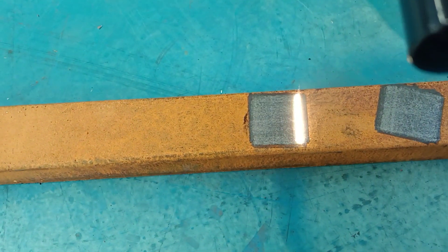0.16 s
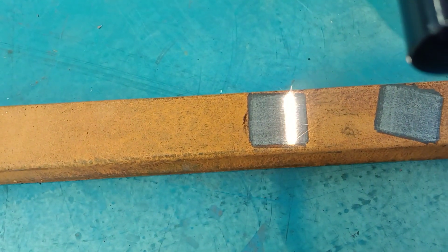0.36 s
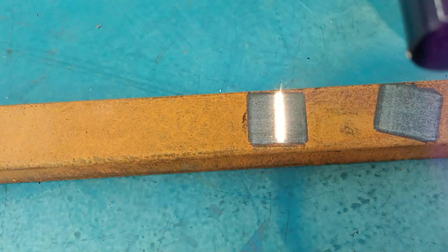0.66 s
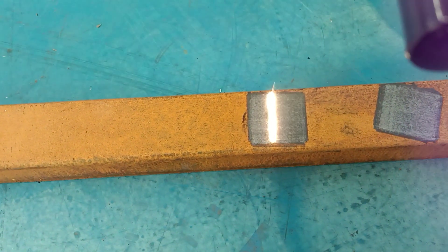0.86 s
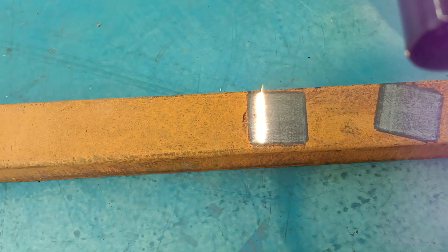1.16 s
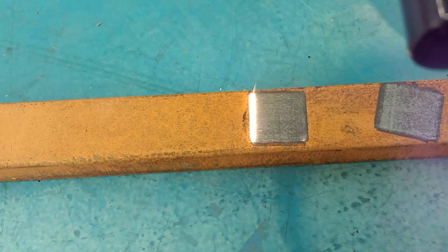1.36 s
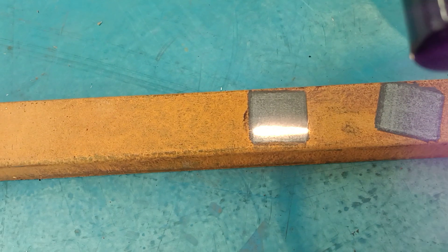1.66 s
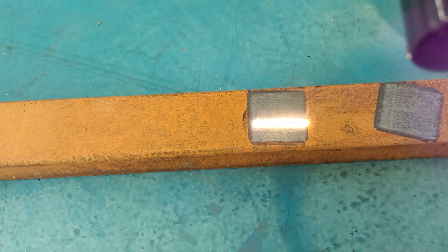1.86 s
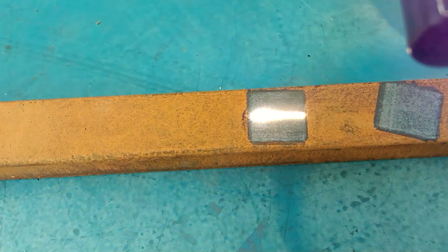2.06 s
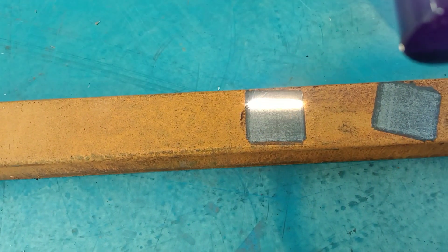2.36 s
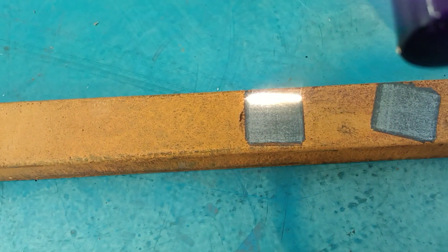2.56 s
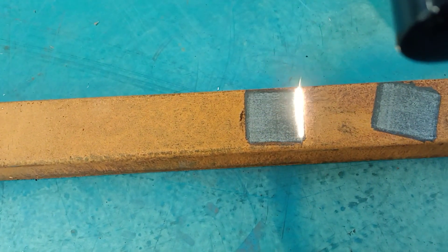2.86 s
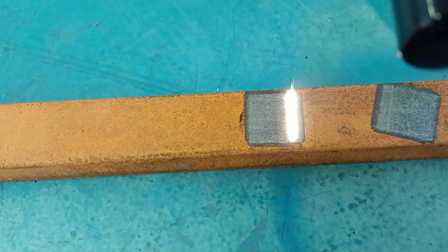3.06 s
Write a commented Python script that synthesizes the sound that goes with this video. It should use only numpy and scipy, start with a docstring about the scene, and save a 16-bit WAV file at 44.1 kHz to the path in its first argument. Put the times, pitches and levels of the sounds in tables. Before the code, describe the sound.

Harsh, bright laser sizzle with a rapid electric buzz runs continuously, dipping briefly between sweeping passes.

```python
"""Pulsed laser on a metal plate

A pulsed laser sweeps a line over a small plate about 122 times a second and burns off the surface. Each sweep's
crackle partly repeats the last, so the hiss buzzes; it dips just before two of the passes. Behind it an
extraction fan sounds in a workshop: resonated noise for blades and duct, coloured noise for rumble and rush,
wandering sines for hum lines, the middle one at four times the sweep rate. A low sine roughened by noise comes
and goes."""
import sys
import numpy as np
from scipy import signal
from scipy.fft import rfft, irfft, next_fast_len
from scipy.io import wavfile
from scipy.ndimage import uniform_filter1d

SR = 44100
rng = np.random.default_rng(int(sys.argv[2]) if len(sys.argv) > 2 else 0)


def bounce(signal):
    """Save signal as a 16-bit WAV file at the path given by the first command-line argument."""
    frames = np.transpose(np.atleast_2d(signal))
    limited = np.clip(frames, -1, 1)
    pcm = np.round(limited * 32767).astype(np.int16)
    wavfile.write(sys.argv[1], SR, pcm)


N = 142443  # length in samples


def from_db(db):
    """Turns decibels into an amplitude factor."""
    return 10 ** (np.asarray(db) / 20)


def rms_one(x):
    """Scales a signal to an rms of 1."""
    return x / np.sqrt(np.mean(x ** 2) + 1e-20)


def in_time(rows):
    """Draws straight lines between (seconds, value) points, one value per sample."""
    seconds, values = np.transpose(rows)
    return np.interp(np.arange(N) / SR, seconds, values)


def at_hz(points, hz):
    """Reads a (Hz, value) curve along a logarithmic frequency axis."""
    curve = np.array(points)
    return np.interp(np.log(hz), np.log(curve[:, 0]), curve[:, 1])


def drift(rate_hz):
    """Slow chance: noise through a double one-pole low-pass; spread 1."""
    step = 20  # samples between the points of the slow noise
    r = np.exp(-2 * np.pi * step * rate_hz / SR)
    noise = rng.standard_normal(N // step + 4002)
    slow = signal.lfilter([1], [1, -2 * r, r * r], noise)[4000:]
    return np.interp(np.arange(N) / step, np.arange(len(slow)), rms_one(slow - slow.mean()))


FLICKER_PER_S, FLICKER_SPAN_S = 42, .12  # low-pass rate in Hz, averaging span in seconds


def flutter():
    """Quick flicker with its slow part, a running mean, taken out."""
    quick = drift(FLICKER_PER_S)
    return quick - uniform_filter1d(quick, int(FLICKER_SPAN_S * SR))


def coloured(x, spectrum, gain_db_of_band, bands_per_octave=6):
    """Filters x to a spectrum in overlapping bands, each with its own moving gain; rms 1."""
    size = next_fast_len(N)
    hz = np.maximum(np.arange(size // 2 + 1) * SR / size, 1)
    inside = (hz > spectrum[0][0]) & (hz < spectrum[-1][0] * 1.1)
    shaped = rfft(x, size) * from_db(at_hz(spectrum, hz)) * inside
    place = bands_per_octave * np.log2(hz)
    out = 0
    for k in range(int(place[inside][0]), int(place[inside][-1]) + 2):
        window = np.cos(np.pi / 2 * np.clip(place - k, -1, 1)) ** 2
        band = irfft(shaped * window, size)[:N]
        out = out + band * from_db(gain_db_of_band(2 ** (k / bands_per_octave)))
    return rms_one(out)


def whistle(hz, width_hz):
    """Noise twice through a narrow resonance; rms 1."""
    r = np.exp(-np.pi * width_hz / SR)
    poles = [1, -2 * r * np.cos(2 * np.pi * hz / SR), r * r]
    once = signal.lfilter([1, 0, -1], poles, rng.standard_normal(N + SR))
    return rms_one(signal.lfilter([1], poles, once)[SR:])  # the first second settles the filter


# The low hum's entries. Each row: start in seconds, end in seconds, gain in dB.
HUM_TIMES = [(0, 0.15, -57), (0.857, 0.934, -59), (0.986, 1.437, -55), (1.59, 2.08, -56)]
HUM_HZ, HUM_WIDTH_HZ, HUM_EDGE_S = 76.3, 16, 0.017
HUM_WAVER, HUM_BODY, HUM_BODY_TOP_HZ = 0.45, 0.57, 113  # both levels are rms against a sine of peak 1


def hum():
    """A low sine roughened by resonated noise, on a dull rumble, faded in and out by short ramps."""
    t = np.arange(N) / SR
    gate = 0
    for start, end, db in HUM_TIMES:
        ramp = np.minimum(t - start, end - t) / HUM_EDGE_S + .5
        gate = gate + from_db(db) * np.clip(ramp, 0, 1)
    band = signal.butter(2, [25, HUM_BODY_TOP_HZ], "band", fs=SR, output="sos")
    body = rms_one(signal.sosfilt(band, rng.standard_normal(N)))
    tone = np.sin(2 * np.pi * HUM_HZ * t) + HUM_WAVER * whistle(HUM_HZ, HUM_WIDTH_HZ)
    return gate * (tone + HUM_BODY * body)


# Centre pitches of three steady lines, low to high, in Hz; the middle one sits at four times the laser's sweep
# rate.
HUM_LINES_HZ = [297.3, 485, 599]
# Their swells. Each row: time in seconds, then the middle level in dB of the low, mid and top line.
HUM_LINE_LEVELS = [(0.0, -56, -47, -53), (0.03, -42.5, -54.5, -54), (0.97, -57, -55, -55),
                   (1.47, -49, -71, -59), (1.63, -58.5, -53, -54.5), (2.13, -45.5, -57, -61),
                   (2.28, -55, -68, -79), (2.35, -47, -56, -61), (3.15, -44, -58, -54),
                   (3.23, -70, -62, -62)]
LINE_WANDER_HZ, LINE_WAVER_DB = 2.2, 2.3


def hum_lines():
    """Sines whose pitch wanders and whose level wavers around a slow swell."""
    rows = np.array(HUM_LINE_LEVELS)
    out = 0
    for k, hz in enumerate(HUM_LINES_HZ):
        pitch_hz = hz + LINE_WANDER_HZ * drift(10.9)
        phase = 2 * np.pi * np.cumsum(pitch_hz) / SR
        level_db = in_time(rows[:, [0, k + 1]]) + LINE_WAVER_DB * drift(28.0)
        out = out + np.sqrt(2) * from_db(level_db) * np.sin(phase)
    return out


TONE_WAVER_DB, TONE_WAVER_PER_S = 2.0, 9.6  # shared by the blade tones and the lowest sweep tones
# Blade tones of the fan. Each row: pitch in Hz, resonance width in Hz, middle level in dB.
BLADE_TONES = [(371, 33, -64), (1181, 19, -62.5), (216.4, 14, -62.5)]


def blade_tones():
    """Breathy fan tones: noise through narrow resonances, wavering in level."""
    out = 0
    for hz, width_hz, db in BLADE_TONES:
        level_db = db + TONE_WAVER_DB * drift(TONE_WAVER_PER_S)
        out = out + from_db(level_db) * whistle(hz, width_hz)
    return out


# Colour of the fan rumble. Each row: frequency in Hz, relative density in dB per Hz.
RUMBLE_COLOUR = [(25, -21), (45, -47), (100, -15.5), (180, -7), (250, -4), (330, -0.5), (420, -18.5),
                 (480, -6), (600, -6), (680, -15), (800, -41)]
RUMBLE_DB, RUMBLE_FLICKER_DB = -49, 6
RUMBLE_SINKS_HZ, RUMBLE_SINKS = 440, .45  # lowest sinking band, share of the top line's dB swing


def rumble():
    """Lumpy low noise in flickering bands; its upper part sinks and rises with the top hum line."""
    top_line_db = in_time(np.array(HUM_LINE_LEVELS)[:, [0, 3]])
    sink_db = RUMBLE_SINKS * (top_line_db - np.median(top_line_db))

    def band_db(hz):
        return RUMBLE_FLICKER_DB * drift(10.4) + sink_db * (hz > RUMBLE_SINKS_HZ)

    return from_db(RUMBLE_DB) * coloured(rng.standard_normal(N), RUMBLE_COLOUR, band_db)


# Colour of the air rush. Each row: frequency in Hz, relative density in dB per Hz.
RUSH_COLOUR = [(640, -7), (740, -4.5), (860, 0.5), (930, -1), (1000, -6.5), (1100, -6)]
# Its swells. Each row: time in seconds, level in dB.
RUSH_LEVEL = [(0.0, -50), (0.11, -63), (1.38, -63), (1.56, -50.5), (1.65, -73), (1.87, -53.5), (1.99, -67),
              (2.46, -70), (2.86, -74), (3.23, -57)]


def rush():
    """A faint rush of air between rumble and hiss: flickering bands of noise."""
    noise = rng.standard_normal(N)
    air = coloured(noise, RUSH_COLOUR, lambda hz: 5.5 * drift(8.8), bands_per_octave=10)
    return from_db(in_time(RUSH_LEVEL)) * air


# Swells of the duct resonance. Each row: time in seconds, level in dB.
DUCT_LEVEL = [(0.0, -48), (0.05, -41), (0.15, -47.5), (0.46, -44), (0.75, -48.5), (0.78, -45.5),
              (1.55, -65), (1.61, -52), (1.96, -94), (2.01, -52), (2.31, -78), (2.37, -45), (2.92, -54),
              (3.23, -45.5)]
DUCT_HZ, DUCT_WIDTH_HZ = 212.4, 61


def fan():
    """Blade tones, three wandering lines (the middle one at four times the laser's sweep rate), rumble and
    rush, with noise ringing in a duct that swells and fades."""
    duct = from_db(in_time(DUCT_LEVEL)) * whistle(DUCT_HZ, DUCT_WIDTH_HZ)
    return blade_tones() + hum_lines() + duct + rumble() + rush()


SWEEPS_PER_S = 121.87
# Crackle carried into the next sweep. Each row: frequency in Hz, amplitude share 0-1.
SWEEP_RETURN = [(1000, 0.5), (2500, 0.5), (4500, 0.71), (7000, 0), (15000, 0.7)]
# Level of the repeating part within the crackle. Each row: frequency in Hz, level in dB.
REPEATING_LEVEL = [(1000, -0.5), (2500, -2.5), (4500, -4), (6500, -1.5), (9000, -4.5), (15000, -10)]
PULSE_DEPTH, TURN_DEPTH = .105, .095  # swing once and twice a sweep
SPARK_DB, SPARK_PER_S = 1, 315  # unevenness of the crackle


def sweep_crackle():
    """Noise partly fed back one sweep later, pulsed by the mirror and uneven in level."""
    size = next_fast_len(N + SR // 2)
    hz = np.maximum(np.arange(size // 2 + 1) * SR / size, 1)
    back = np.clip(at_hz(SWEEP_RETURN, hz), 0, .95)
    one_sweep_later = np.exp(-2j * np.pi * hz / SWEEPS_PER_S)
    repeat = np.sqrt(1 - back ** 2) / (1 - back * one_sweep_later)
    old, fresh = rfft(rng.standard_normal((2, size)))
    share = np.clip(from_db(2 * at_hz(REPEATING_LEVEL, hz)), 0, 1)  # as power
    crackle = irfft(np.sqrt(share) * old * repeat + np.sqrt(1 - share) * fresh, size)[:N]
    turn = 2 * np.pi * SWEEPS_PER_S * np.arange(N) / SR
    mirror = 1 + PULSE_DEPTH * np.cos(turn) + TURN_DEPTH * np.cos(2 * turn)
    return crackle * mirror * from_db(SPARK_DB * drift(SPARK_PER_S))


# The beam slackens, then starts a new pass. Each row: restart in seconds, depth in dB.
BEAM_RESTARTS = [(0.075, -6), (2.936, -5)]
SLACKEN_S, SLACK_HOLD_S, RETURN_S = 0.058, 0.026, 0.003


def beam_slack_db():
    """The beam's dips in dB: a ramp down, a short hold, and a quick return from the restart on."""
    t = np.arange(N) / SR
    slack = 0
    for restart, db in BEAM_RESTARTS:
        falling = 1 + (t - restart + SLACK_HOLD_S) / SLACKEN_S
        returning = 1 - (t - restart) / RETURN_S
        slack = slack + db * np.clip(np.minimum(falling, returning), 0, 1)
    return slack


# Colour of the hiss as it reaches the microphone. Each row: frequency in Hz, relative density in dB per Hz.
HISS_COLOUR = [(1000, -49), (1080, -36.5), (1190, -19), (1400, -21.5), (1470, -15.5), (1540, -18),
               (1650, -16), (2000, -23), (2200, -14.5), (2380, -7), (2550, -12), (2850, -15), (3000, -9),
               (3170, 1.5), (3300, -2), (3600, 1.5), (3830, -8), (3950, -2.5), (4080, -8), (4270, 0.5),
               (4700, -3.5), (4900, -13), (5400, -6.5), (5750, -1.5), (6250, -12.5), (6420, -21),
               (6750, -18), (7300, -24.5), (7900, -17.5), (8120, -27.5), (8900, -27), (9200, -35),
               (9330, -46), (9480, -36), (9800, -29.5), (10450, -29.5), (10650, -34), (10950, -24),
               (11600, -32.5), (12000, -28), (12750, -32), (13000, -24.5), (14000, -26), (14400, -27),
               (14900, -21), (15400, -22), (16200, -26)]
# Flicker of each band. Each row: frequency in Hz, factor on the band's own flicker.
BAND_GRAIN = [(1200, 1.7), (2500, 1.3), (5900, 0.8), (6450, 3.8), (7500, 3.8), (8000, 1.0), (14000, 1.3)]
# Extra colour of the crosswise pass. Each row: frequency in Hz, gain in dB.
CROSSWISE_COLOUR = [(1200, 1.5), (1600, -1), (2500, 0.5), (3800, 0.5), (4950, 0.5), (5700, -0.5),
                    (7000, 0.5), (8500, 0), (9800, 0.5), (10800, -0.2), (11800, -0.5), (13500, 2.5),
                    (15500, .4)]
# Colour change within a pass. Each row: frequency in Hz, dB gained over one pass.
PASS_FADE = [(5500, 0.5), (7200, -1.5), (8800, -4), (9800, 4), (10900, -3.5), (11900, -4), (13500, -0.5),
             (15500, 1)]
# Starts of the passes, in seconds.
PASS_STARTS = [.073, 1.49, 2.938]
PASS_S, CROSSWISE_FROM_S, CROSSWISE_TO_S = 1.43, 1.49, 2.94
FLICKER_DB, SHARED_DB, SLOW_DB = 1.5, .5, .4  # scale of band flicker, common flicker and slow band drift
TREBLE_FROM_HZ, TREBLE_SLACKENS = 8500, 1.45  # the treble dips this many times as deep in dB
# as the line turns crosswise one band goes dull, then recovers
DULL_LOW_HZ, DULL_HIGH_HZ, DULL_DB, DULL_RECOVER_S = 9450, 10300, -6, .22


def hiss(slack_db):
    """Colours the crackle in narrow bands that flicker and change with the pass and its direction."""
    t = np.arange(N) / SR
    shared_db = SHARED_DB * (flutter() + drift(9.0))
    treble_db = (TREBLE_SLACKENS - 1) * slack_db
    starts = np.array([PASS_STARTS[0] - PASS_S] + PASS_STARTS)
    latest_start = starts[np.searchsorted(starts, t, "right") - 1]
    progress = (t - latest_start) / PASS_S - .5  # zero halfway through a pass
    crosswise = (t > CROSSWISE_FROM_S) & (t < CROSSWISE_TO_S)
    dull_db = DULL_DB * crosswise * np.exp(-np.abs(t - CROSSWISE_FROM_S) / DULL_RECOVER_S)

    def band_db(hz):
        flicker = shared_db + FLICKER_DB * at_hz(BAND_GRAIN, hz) * flutter() + SLOW_DB * drift(1.0)
        direction = crosswise * at_hz(CROSSWISE_COLOUR, hz) + dull_db * (DULL_LOW_HZ < hz < DULL_HIGH_HZ)
        fade = progress * at_hz(PASS_FADE, hz)
        return flicker + direction + fade + treble_db * (hz > TREBLE_FROM_HZ)

    return coloured(sweep_crackle(), HISS_COLOUR, band_db, bands_per_octave=20)


# Tones standing out of the buzz. Each row: multiple of the sweep rate, middle level in dB against the hiss.
SWEEP_TONES = [(6, -58), (7, -56.5), (10, -37), (12, -31), (19, -27), (20, -28.5), (26, -21), (28, -18),
               (29, -26), (35, -19.5)]


def sweep_tones():
    """Multiples of the sweep rate as narrow resonated noise; those below the ninth waver further."""
    out = 0
    for multiple, db in SWEEP_TONES:
        waver_db = TONE_WAVER_DB * drift(TONE_WAVER_PER_S) * (multiple < 9)
        out = out + from_db(db + waver_db) * whistle(multiple * SWEEPS_PER_S, width_hz=9.1)
    return out


# Vigour of the burning, before the beam's dips. Each row: time in seconds, level in dB.
BURN_LEVEL = [(0, -21.5), (.07, -20), (.1, -23), (.25, -21.5), (.7, -22), (1.1, -22.5), (1.5, -23.5),
              (1.75, -23), (2.1, -22), (2.55, -22), (2.7, -23.5), (2.85, -23.5), (2.95, -23), (3.1, -20.5),
              (3.16, -23), (3.23, -22)]


def laser():
    """Burning hiss and sweep tones, following the vigour of the burning and the beam's dips."""
    slack_db = beam_slack_db()
    return from_db(in_time(BURN_LEVEL) + slack_db) * (hiss(slack_db) + sweep_tones())


def scene():
    """Adds hum, fan and laser into one channel."""
    return (hum() + fan() + laser())[None]


CUTOFF_HZ = 15720


def record(dry):
    """Cuts the top steeply with an elliptic low-pass."""
    low_pass = signal.ellip(14, .5, 75, CUTOFF_HZ, fs=SR, output="sos")  # ripple and stopband in dB
    return signal.sosfilt(low_pass, dry)


dry = scene()
out = record(dry)
bounce(out)
```